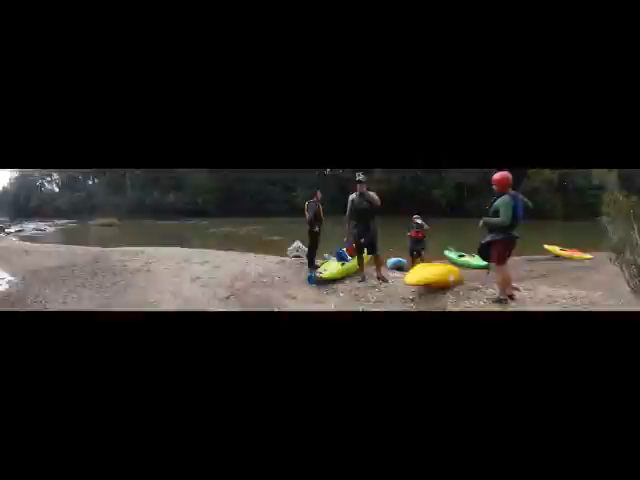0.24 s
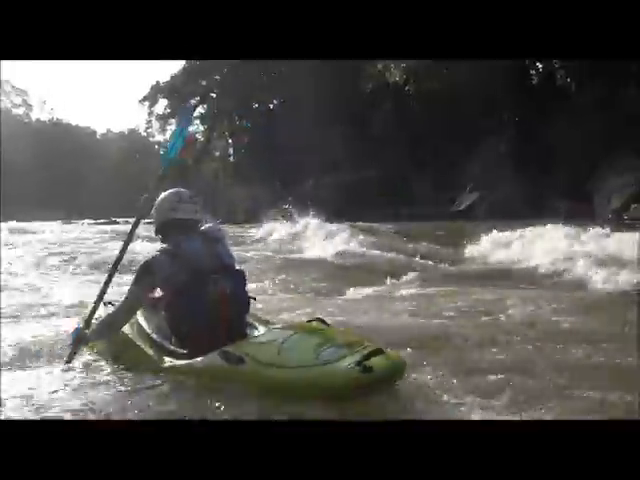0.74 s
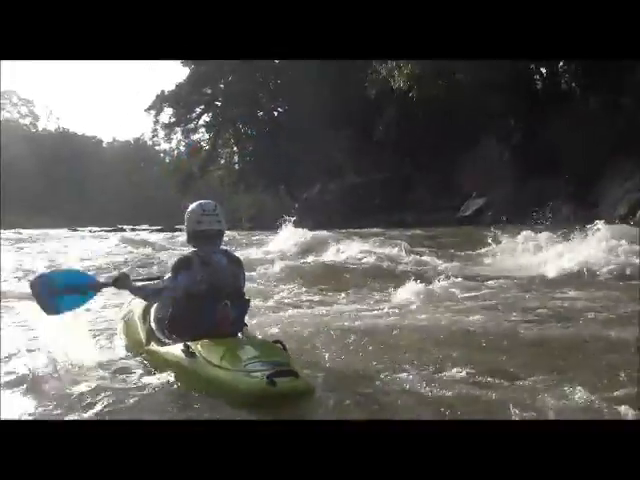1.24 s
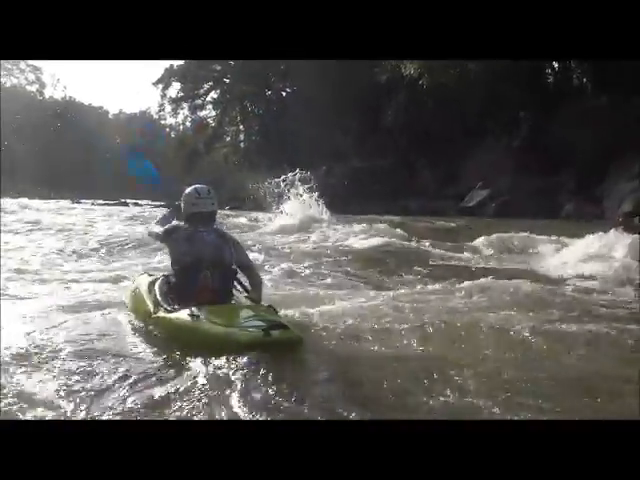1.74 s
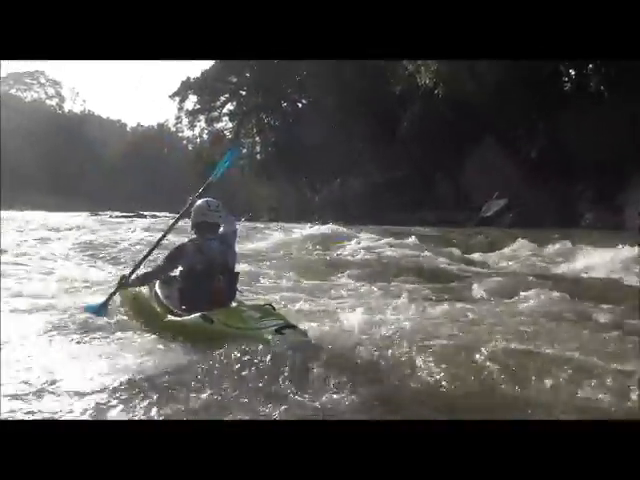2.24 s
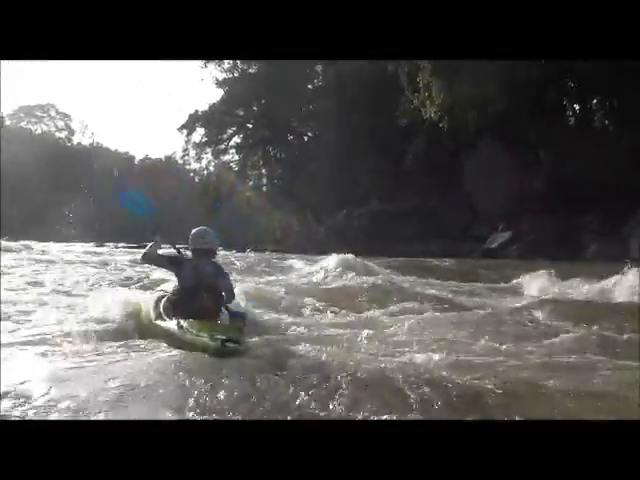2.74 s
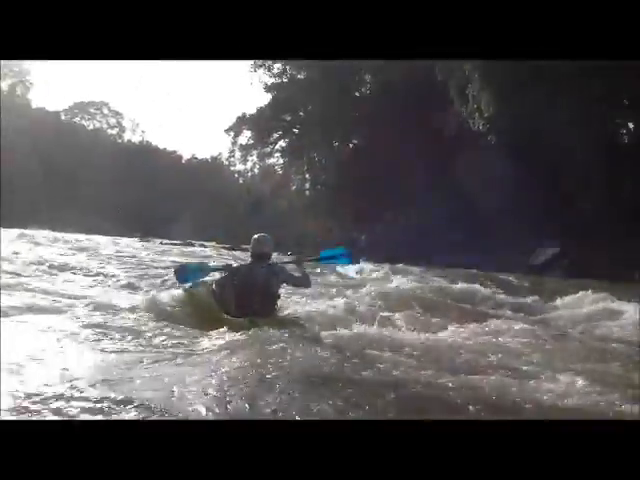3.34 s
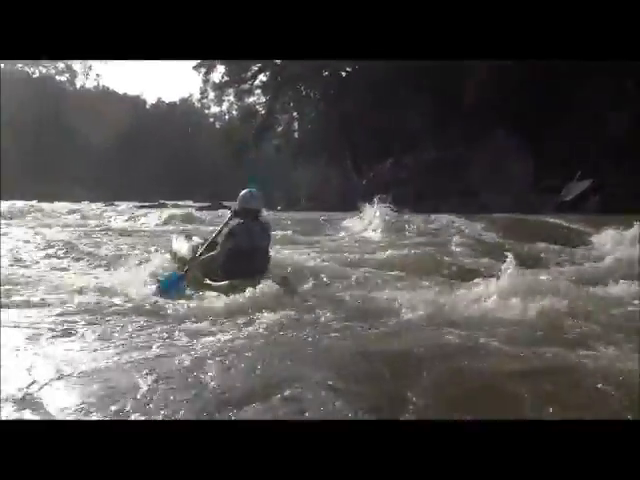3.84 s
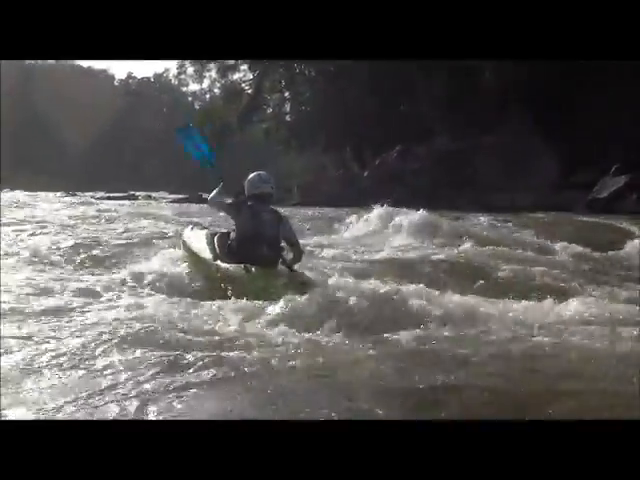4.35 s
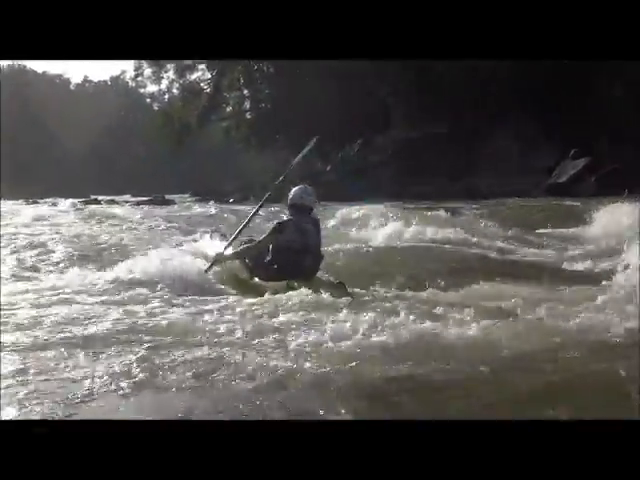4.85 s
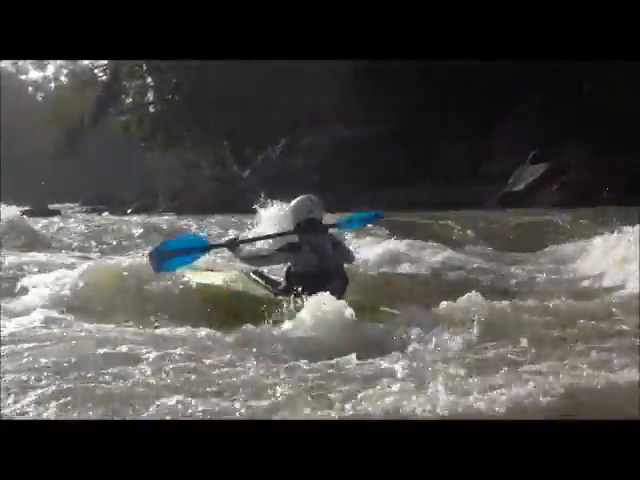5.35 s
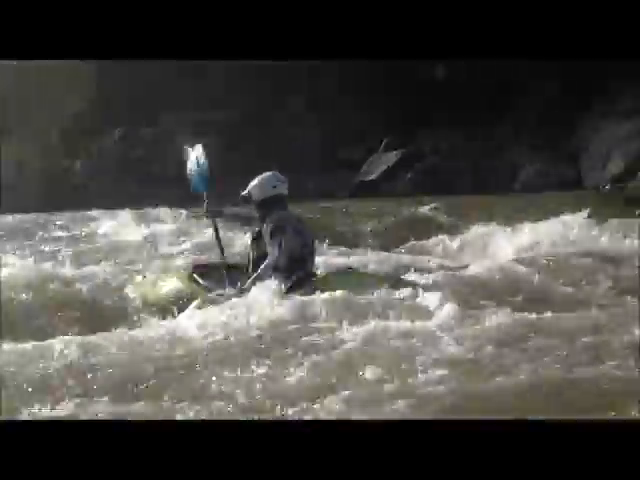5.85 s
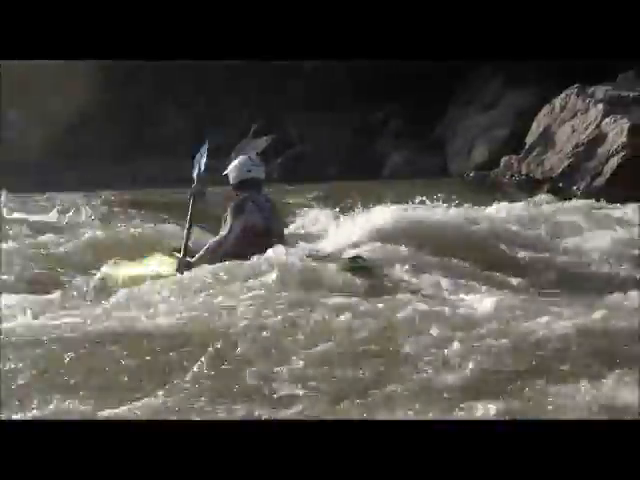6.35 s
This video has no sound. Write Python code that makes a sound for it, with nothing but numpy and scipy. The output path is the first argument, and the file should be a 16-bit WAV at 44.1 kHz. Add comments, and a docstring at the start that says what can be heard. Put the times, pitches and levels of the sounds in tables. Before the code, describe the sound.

After a brief silence, the loud roar of river rapids starts abruptly and carries on, a dense wash of collapsing foam and fizzing bubbles that gently swells and dips. Close to the microphone, drops plop and short splashes burst at uneven intervals. Waves bump a kayak's hull now and then, and a few small clicks jolt the microphone. It is heard outdoors from a boat at water level.

```python
"""White water from a boat below a rapid.

Collapsing foam roars and bubbles fizz; their loudness swells, ducks after loud hits as with a
recorder's gain control, then recovers. Nearer, single bubbles and drops ring as plops, splashes
burst as band noise, waves thump the hull and knocks jolt the camera sideways.
The sound starts abruptly after a silence."""
import sys
import numpy as np
from scipy import signal
from scipy.fft import rfft, irfft
from scipy.io import wavfile
from scipy.ndimage import uniform_filter1d

SR = 44100
rng = np.random.default_rng(int(sys.argv[2]) if len(sys.argv) > 2 else 0)


def master_out(mix):
    """Clip the mix to full scale and print it as 16-bit PCM to the path in sys.argv[1]."""
    frames = np.transpose(np.atleast_2d(mix))
    ceiling = np.clip(frames, -1, 1)
    pcm = np.round(ceiling * 32767).astype(np.int16)
    wavfile.write(sys.argv[1], SR, pcm)


N = 290619


def gain_of(db):
    """Decibels to amplitude factor."""
    return 10 ** (np.asarray(db) / 20)


def unit_rms(x):
    """Scale to rms 1."""
    return x / np.sqrt(np.mean(x ** 2) + 1e-20)


def curve_at(points, hz):
    """Interpolate (freq_hz, value) points on a log-frequency axis."""
    freq_hz, value = np.transpose(points)
    return np.interp(np.log(hz + 1), np.log(freq_hz + 1), value)


def place(mix, start_s, sound, left_db=0):
    """Add a sound to both microphone ports, the left louder by left_db."""
    part = mix[:, round(start_s * SR):][:, :len(sound)]
    part += gain_of([[left_db / 2], [-left_db / 2]]) * sound[:part.shape[1]]


def ring(hz, t60_s, glide, attack_cycles):
    """Damped sine, peak 1; pitch shifts by the fraction glide over t60_s."""
    t = np.arange(round(t60_s * SR) + 8) / SR
    wave = np.sin(2 * np.pi * hz * (t + glide * t ** 2 / (2 * t60_s))) * gain_of(-60 * t / t60_s)
    wave *= 1 - np.exp(-t * hz / attack_cycles)
    return wave / abs(wave).max()


def fizz(per_s_at_1khz, spread_db, t60_cycles):
    """Bubbles of 32 sizes ring at random: small ones more often, a few much louder."""
    out = np.zeros(N)
    for hz in np.geomspace(150, 14000, 32):
        onsets = rng.random(N) < per_s_at_1khz / SR * (hz / 1000) ** .6
        strength = gain_of(spread_db * np.minimum(rng.exponential(1, N), 5))
        bubble = ring(hz, t60_cycles / hz, glide=0.27, attack_cycles=0.25)
        out += np.sqrt(hz) * unit_rms(signal.oaconvolve(onsets * strength, bubble)[:N])  # equal power/Hz
    return unit_rms(out)


def churn():
    """Two independent layers of foam noise and fizz with common loudness curves and flicker."""
    # Power share of separate bubbles: freq_hz, share
    bubble_share = [(150, 0.37), (600, 0.17), (2500, 0.19), (6000, 0.16), (13000, 0.34)]
    # Loudness swells, ducks after loud hits as with a recorder's gain control, then recovers.
    # Used about each level's mean: time_s, roar_db, splash_db, spray_db
    loudness = [(0.6, -15.5, -19, -21), (0.76, -16.5, -19.5, -20.5), (0.86, -19, -21, -21),
                (1.13, -16.5, -22, -22.5), (1.3, -19.5, -25, -25), (1.75, -20.5, -23.5, -25.5),
                (2.1, -20, -23.5, -25), (2.3, -19.5, -20.5, -23), (2.8, -16.5, -22, -24.5),
                (3.08, -18.5, -22, -25.5), (3.16, -21, -26, -28), (3.55, -20.5, -24.5, -27),
                (3.75, -21.5, -22, -26.5), (4.05, -20.5, -23, -26), (4.2, -18, -21, -23),
                (4.6, -19, -22, -25), (4.85, -17.5, -20.5, -23.5), (5.05, -19, -23, -24.5),
                (5.45, -19, -23.5, -25.5), (5.9, -18.5, -24, -25), (6.55, -17, -23, -25)]
    # How far each band follows the loudness curves: freq_hz, roar_weight, splash_weight, spray_weight
    band_weights = [(300, 0.25, 0., 0.63), (800, 1, 0, 0.011), (2360, 0, 0.94, 0), (8000, 0.029, 0, 0.97)]
    frames = dict(fs=SR, nperseg=512, noverlap=384)
    layers = []
    for _ in range(2):
        hz, t, foam = signal.stft(rng.standard_normal(N), **frames)
        bubbles = signal.stft(fizz(per_s_at_1khz=60, spread_db=1.72, t60_cycles=9.1), **frames)[2]
        share = curve_at(bubble_share, hz)[:, None]
        water = np.sqrt(1 - share) * foam + np.sqrt(share) * bubbles
        patches = uniform_filter1d(rng.standard_normal(foam.shape), size=7, axis=0)
        patches_db = 0.63 * unit_rms(uniform_filter1d(patches, size=18, axis=1))
        layers.append(water * gain_of(patches_db))
    time_s, *levels_db = np.transpose(loudness)
    curves_db = [np.interp(t, time_s, db - db.mean()) for db in levels_db]
    band_hz, *columns = np.transpose(band_weights)
    weights = np.transpose([curve_at(np.transpose([band_hz, column]), hz) for column in columns])
    flicker_db = 0.61 * unit_rms(uniform_filter1d(rng.standard_normal(len(t)), size=9))
    return signal.istft(layers * gain_of(weights @ curves_db + flicker_db), **frames)[1][:, :N]


def river():
    """Roar of collapsing foam: churn with one spectrum, partly shared by the two ports."""
    # Foam spectrum: freq_hz, relative_density_db
    foam_spectrum = [(15, -59), (25, -27), (86, -15), (173, -3), (281, 2), (567, 1), (703, 2.5), (1200, 1),
                     (1490, -6), (1850, -4.5), (2120, -6.5), (4870, -13), (8810, -13.5), (12800, -19.5),
                     (15500, -41)]
    # Likeness of the ports: freq_hz, coherence
    port_coherence = [(60, .998), (250, .99), (420, .965), (520, .81), (775, .75), (950, .94), (1150, .89),
                      (1300, .6), (1460, .5), (1650, .82), (2600, .93), (8000, .92), (10000, .975),
                      (12000, .999)]
    # Level, left over right: freq_hz, left_db
    port_balance = [(60, 0), (250, .3), (500, 1.3), (770, 2.4), (1150, .4), (2500, .4), (5500, -1),
                    (10000, -.1), (15000, 0)]
    # Phase, left ahead of right: freq_hz, lead_rad
    port_lead = [(100, 0), (520, .04), (720, .36), (870, 0), (1130, -.58), (1380, .1), (1600, -.2),
                 (4500, -.16), (8300, .17), (11000, 0)]
    mid, side = rfft(churn())
    hz = np.fft.rfftfreq(N, 1 / SR)
    coherence = curve_at(port_coherence, hz)
    mid *= np.sqrt((1 + coherence) / 2)
    side *= np.sqrt((1 - coherence) / 2)
    skew = gain_of(curve_at(port_balance, hz) / 2) * np.exp(.5j * curve_at(port_lead, hz))
    ports = np.array([(mid + side) * skew, (mid - side) / skew])
    roar = irfft(ports * gain_of(curve_at(foam_spectrum, hz)), N)
    return gain_of(-15) * unit_rms(roar)


def hull_thumps():
    """The hull answers each wave with a low, damped push."""
    # Waves on the hull: start_s, peak_db, pitch_hz, t60_s
    waves = [(1.21, -28, 80, 0.22), (1.35, -26, 70, 0.1), (3.1339, -3.5, 280, 0.021),
             (3.144, -32.5, 74, 0.31), (4.951, -31, 80, .2)]
    out = np.zeros((2, N))
    for start_s, peak_db, pitch_hz, t60_s in waves:
        place(out, start_s, -gain_of(peak_db) * ring(pitch_hz, t60_s, glide=-0.24, attack_cycles=0.096))
    return out


def camera_knocks():
    """A sideways knock pushes one port in and the other out."""
    # Knocks: start_s, peak_db, pitch_hz, t60_s, sign (left port in +1, out -1)
    knocks = [(3.417, -4, 600, 0.004, 1), (4.1806, -9, 330, 0.0076, -1), (4.8656, -4, 550, 0.0026, 1),
              (5.478, -12, 300, .01, -1)]
    out = np.zeros((2, N))
    for start_s, peak_db, pitch_hz, t60_s, sign in knocks:
        knock = ring(pitch_hz, t60_s, glide=-0.3, attack_cycles=0.54)
        place(out, start_s, sign * gain_of(peak_db) * knock)
    return out * [[1], [-1]]


def splashes():
    """Each near splash is a decaying noise burst in a bell-shaped band."""
    # Splashes: start_s, level_db, centre_hz, width_octaves, t60_s, left_db
    bursts = [(2.0595, -4.5, 2000, .7, 0.014, 1.5), (2.603, -21, 1900, .25, .16, 7),
              (3.1005, -6.5, 1800, 1, 0.057, 4), (3.2765, -10.5, 3000, 0.98, 0.035, 4),
              (3.469, -4, 1500, 2.2, 0.019, 0), (3.73, -9, 3500, 1.1, 0.02, 2.5),
              (4.168, -20, 8000, .6, .1, .5), (4.707, -16.5, 3680, .4, 0.061, -1),
              (4.775, -16.5, 9000, 0.39, .05, -2), (4.86, -14, 890, .5, 0.22, 5),
              (4.9285, -3, 2500, .8, 0.011, 6), (4.949, -1, 4500, 1.2, .009, 1.5),
              (5.306, -10.5, 990, 0.82, 0.092, -3), (5.923, -13, 8000, .7, .02, 0),
              (6.151, -8.5, 4500, 0.64, 0.012, 5)]
    length, attack_s = 4096, 0.001
    t = np.arange(length) / SR
    hz = np.fft.rfftfreq(length, 1 / SR) + 1
    out = np.zeros((2, N))
    for start_s, level_db, centre_hz, width_octaves, t60_s, left_db in bursts:
        band = np.exp(-.5 * (np.log2(hz / centre_hz) / width_octaves) ** 2) / np.sqrt(hz)
        noise = unit_rms(irfft(rfft(rng.standard_normal(length)) * band))
        envelope = gain_of(-60 * t / t60_s) * (1 - np.exp(-t / attack_s))
        place(out, start_s, gain_of(level_db) * noise * envelope, left_db)
    return out


def plops():
    """Near bubbles and drops ring once, small ones high and short; pitch climbs toward the surface."""
    # Bubbles and drops: start_s, peak_db, pitch_hz
    bubbles = [(0.7009, -9, 2660), (0.9125, -4, 1280), (0.92, -9, 1320), (0.9834, -14, 6290),
               (1.0804, -11, 8830), (1.1295, -13, 3140), (1.1851, -5.5, 630), (2.0601, -8.5, 1090),
               (2.6046, -7, 1900), (2.619, -15, 1900), (2.629, -15, 1720), (2.6392, -13, 2270),
               (2.65, -14, 2400), (2.6954, -9.5, 1700), (2.7121, -9, 1210), (2.7221, -12, 1500),
               (2.7343, -9, 4110), (2.7498, -10, 980), (2.8142, -12, 2540), (2.817, -9.5, 1180),
               (3.074, -11, 1200), (3.0795, -10, 1086), (3.087, -9, 1050), (3.1013, -10, 5560),
               (3.104, -11, 1190), (3.1065, -13, 1450), (3.1113, -14, 474), (3.2764, -8.5, 2580),
               (3.3303, -14, 5300), (3.3698, -13, 5780), (3.4692, -13, 390), (4.2779, -9, 990),
               (4.5202, -12, 740), (4.7154, -11, 3470), (4.8823, -8, 1080), (4.9246, -16, 13000),
               (4.9292, -9.5, 3640), (4.9494, -12, 9500), (4.9832, -12, 1750), (5.3056, -5.5, 413),
               (5.317, -9, 486), (5.3245, -10, 724), (5.333, -13, 594), (5.3558, -8, 10000),
               (6.0286, -12, 1115)]
    t60_cycles = 23
    out = np.zeros((2, N))
    for start_s, peak_db, pitch_hz in bubbles:
        plop = ring(pitch_hz, t60_cycles / pitch_hz, glide=0.044, attack_cycles=1.7)
        place(out, start_s, gain_of(peak_db) * plop, left_db=1.5)
    return out


def scene():
    """River plus the near sounds, in stereo."""
    return river() + hull_thumps() + camera_knocks() + splashes() + plops()


def record(dry):
    """Abrupt switch-on, bass cut, soft peak ceiling, band limit."""
    start_s, ramp_s = 0.5625, 0.001
    low_cut_hz, high_cut_hz = 42, 15600
    gate = np.clip((np.arange(N) / SR - start_s) / ramp_s, 0, 1)
    thinned = signal.sosfilt(signal.butter(2, low_cut_hz, "high", fs=SR, output="sos"), dry * gate)
    limited = 1.544 * np.tanh(thinned / 1.441)
    lowpass = signal.firwin(511, high_cut_hz, window=("kaiser", 9), fs=SR)
    return signal.oaconvolve(limited, lowpass[None], "same")


dry = scene()
out = record(dry)
master_out(out)
```